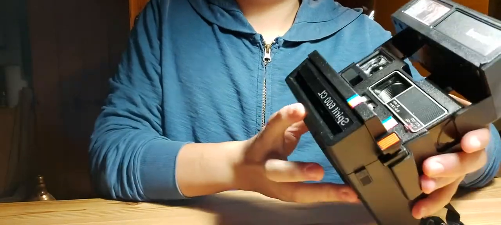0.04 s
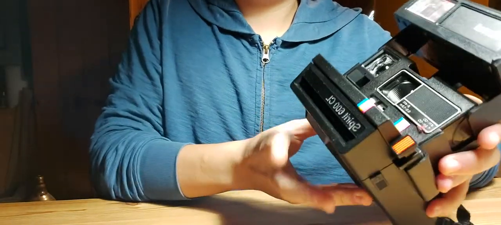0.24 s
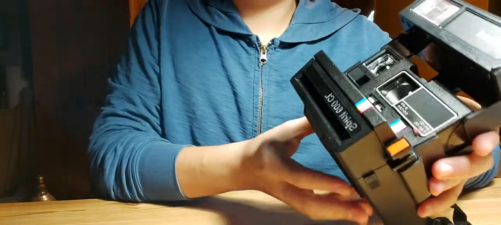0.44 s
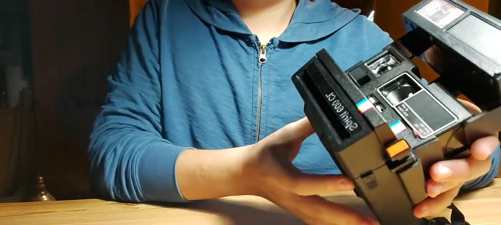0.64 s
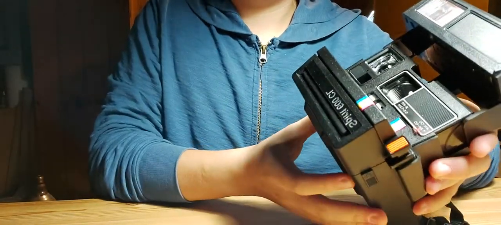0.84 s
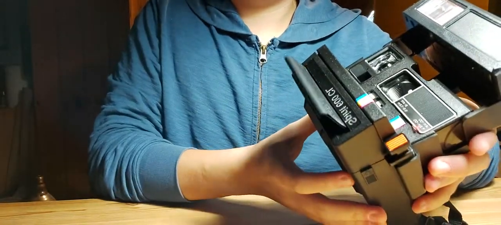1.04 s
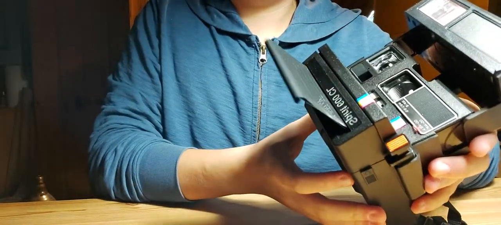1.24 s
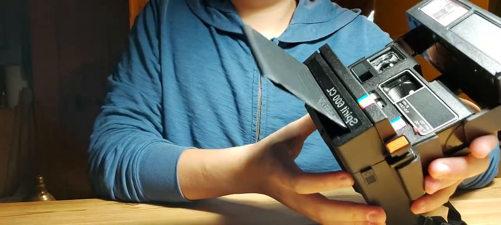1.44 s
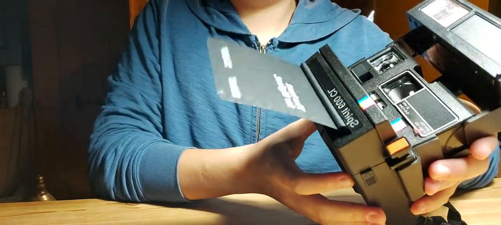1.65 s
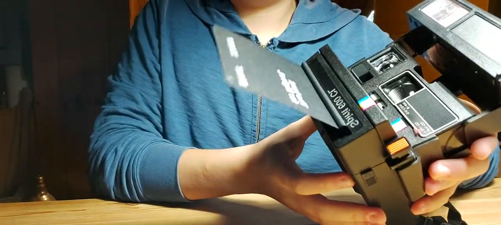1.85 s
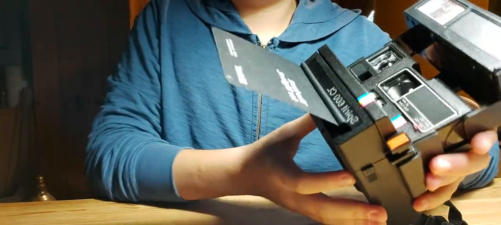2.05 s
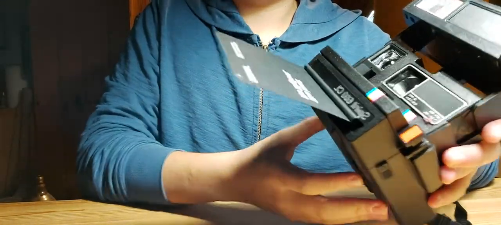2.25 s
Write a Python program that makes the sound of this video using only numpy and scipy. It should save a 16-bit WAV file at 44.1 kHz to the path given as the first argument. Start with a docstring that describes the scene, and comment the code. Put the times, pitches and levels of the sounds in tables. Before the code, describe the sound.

An instant camera's small motor starts at once, whining through rattling plastic gears, close by in a quiet room. At 0.8 seconds a click and a short falling squeak lead into roller grinding that grows louder. From about 1.3 to 1.7 seconds the sheet snaps free with sharp clacks and hollow knocks. The motor races briefly, a latch clicks near 1.9 seconds, and the gears stop by 2.1.

```python
"""An instant camera, held over a table in a quiet room, ejects a sheet.
Its small motor spins up and whines through a rattling plastic gear train, then slows as the rollers
bite with a squeak and grind along the sheet. The sheet snaps free in a cluster of clacks and hollow
knocks; the motor races briefly, a latch clicks and the gears coast to rest."""
import sys
import numpy as np
from scipy import signal
from scipy.fft import rfft, irfft
from scipy.io import wavfile

SR = 44100
rng = np.random.default_rng(int(sys.argv[2]) if len(sys.argv) > 2 else 0)


def generate_wav(sig):
    """Save sig (samples, or channels by samples) to the path in sys.argv[1] as 16-bit PCM at SR."""
    pcm = np.round(np.clip(np.atleast_2d(sig).T, -1, 1) * 32767).astype(np.int16)
    wavfile.write(sys.argv[1], SR, pcm)


N = 101429
T = np.arange(N) / SR

# The motor under power. Each row: time in seconds, turns per second.
MOTOR_SPEED = [(0,150),(.05,192),(.11,220),(.2,233),(.47,232.5),(.6,224.5),(.785,221.5),(.84,232),(.862,200),(.89,194.3),(.96,203.8),(1.0,205.5),(1.06,202.7),(1.15,208.5),(1.23,203.2),(1.31,207.5),(1.53,213),(1.6,218),(1.69,207),(1.75,221),(1.815,224),(1.85,198)]
POWER_OFF_S = MOTOR_SPEED[-1][0]
# The casing's resonances. Each row: pitch in Hz, relative level in dB, seconds to fade by 60 dB.
CASING_MODES = [(310,-14,.07),(630,-5,.06),(690,-3,.06),(930,-3,.09),(1100,-4,.08),(2433,-3,.055),(3741,-11,.06),(4215,-8,.06),(4974,-8,.05)]


def amp(db):
    """Decibels to gain."""
    return 10 ** (np.asarray(db) / 20)


def unit(x):
    """Scales to rms 1."""
    return x / np.sqrt(np.mean(x ** 2) + 1e-20)


def curve(points, column=1):
    """One column of a time table, at every sample."""
    points = np.array(points)
    return np.interp(T, points[:, 0], points[:, column])


def at_hz(points, hz):
    """Reads a spectrum table on a log-frequency axis."""
    f, value = np.transpose(points)
    return np.interp(np.log(hz + 1), np.log(f + 1), value)


def low_cut(x, hz, order):
    """Rolls off the bass."""
    return signal.sosfilt(signal.butter(order, hz, "high", fs=SR, output="sos"), x)


def drift(rate_hz):
    """Slow random wander of rms 1."""
    f = np.fft.rfftfreq(N, 1 / SR)
    return unit(irfft(rfft(rng.standard_normal(N)) / (1 + (f / rate_hz) ** 2) ** 2, N))


def partial(base_hz, multiple, wobble_hz, flutter):
    """A sine at a multiple of a wavering base pitch, fluttering in level."""
    turns = np.cumsum(base_hz + wobble_hz * drift(rate_hz=45)) / SR
    tone = np.sqrt(2) * np.sin(2 * np.pi * (multiple * turns + rng.random()))
    return tone * (1 + flutter * drift(rate_hz=36))


def colour(pair, tone, tilt_db=0):
    """Gives two unrelated signals an EQ curve and a stereo width, at rms 1."""
    # Each row: frequency in Hz, left-right correlation.
    likeness = [(200,0.68),(500,1),(1200,0.25),(2500,0.42),(5000,0.17),(15000,0)]
    n = pair.shape[1]
    f = np.fft.rfftfreq(n, 1 / SR)
    left, other = rfft(pair)
    shared = at_hz(likeness, f)
    right = shared * left + np.sqrt(1 - shared ** 2) * other
    octaves = np.log2(np.maximum(f, 400) / 2000)
    return unit(irfft(np.array([left, right]) * amp(at_hz(tone, f) + tilt_db * octaves), n))


def background():
    """A bed of soft room noise and faint steady tones."""
    # Each row: frequency in Hz, relative level in dB.
    air_tone = [(30, -13), (120, -2.5), (400, -4.5), (1200, -15), (4000, -22.5), (15000, -24)]
    # Room hum. Each row: base pitch in Hz (it sounds 2% lower), level in dB.
    hum = [(463,-77),(926,-74.5)]
    air = amp(-75) * colour(rng.standard_normal((2, N)), air_tone)
    return air + sum(amp(db) * partial(hz, 0.98, wobble_hz=0.71, flutter=0.093) for hz, db in hum)


def room(x):
    """A small room's diffuse tail, the treble dying first."""
    # Each row: frequency in Hz, seconds to fade by 60 dB.
    reverb_time = [(100,0.37),(700,0.39),(4000,0.25),(15000,0.16)]
    hz, t, noise = signal.stft(rng.standard_normal((2, SR // 2)), SR, nperseg=256)
    tail = signal.istft(noise * amp(-60 * t / at_hz(reverb_time, hz)[:, None]), SR, nperseg=256)[1]
    tail *= np.minimum(T[:tail.shape[1]] / 0.0046, 1)
    return signal.fftconvolve(x, tail / np.linalg.norm(tail[0]), axes=1)[:, :N]


def shell(x, ring_s, count=3, fades_per_s=1.5):
    """The plastic shell's dense, shallow ring, different on each side.
    Random rings crossfade so no pitch sticks out."""
    t = T[:2048]
    modes = rfft(rng.standard_normal((count, 2, len(t))) * np.exp(-t / ring_s))
    rings = irfft(modes / np.sqrt(abs(modes)))[..., :len(t) // 2]  # the root softens the peaks
    fades = [np.cos(np.pi * (fades_per_s * T + k / count)) for k in range(count)]
    return sum(signal.fftconvolve(x * fade, ring, axes=1)[:, :N] for fade, ring in zip(fades, rings))


def casing(x):
    """The casing's main modes ring along with whatever shakes it."""
    t = T[:SR // 4]
    ring = sum(amp(db - 60 * t / t60) * np.cos(2 * np.pi * hz * t) for hz, db, t60 in CASING_MODES)
    return x + amp(-26) * signal.fftconvolve(x, ring[None] / np.linalg.norm(ring), axes=1)[:, :N]


def motor(speed, push_s=0.55, ramp_s=.08):
    """A three-pole motor whines; its partials rebalance as the gears take up the sheet."""
    # The whine's fader. Each row: time in seconds, gain in dB.
    whine_level = [(0,-52),(.06,-43.5),(.12,-38),(.2,-43),(.27,-40),(.52,-37.5),(.59,-32),(.78,-35.5),(.81,-44),(.84,-33),(.87,-51),(1.3,-43.5),(1.66,-40.5),(1.71,-39.5),(1.8,-34.5),(1.85,-48.5),(1.95,-62),(2.1,-81)]
    # Each row: multiple of the shaft speed, relative dB running free, relative dB pushing the sheet.
    partials = [(1,-10,-24),(2,-15,-15),(2.5,-25,-22),(3,0,0),(4,-10,-16),(5,-17,-26),(6,-12,-22),(7,-17,-9.3),(11,-24,-21),(21,-21,-28)]
    push = np.clip((T - push_s) / ramp_s + .5, 0, 1)
    whine = sum(amp(free + (loaded - free) * push) * partial(speed, k, wobble_hz=.15, flutter=.08)
                for k, free, loaded in partials)
    return amp(curve(whine_level)) * low_cut(whine, hz=222, order=4)  # a small shell radiates little bass


def teeth(speed, per_turn, spread_db, rub, throb):
    """Tooth contacts of uneven strength and some rubbing, throbbing once a turn."""
    turns = np.cumsum(speed) / SR
    contacts = np.diff(np.floor(turns * per_turn), prepend=0)
    ticks = contacts * rng.standard_normal((2, N)) * amp(spread_db * rng.standard_normal(N))
    return (unit(ticks) + rub * rng.standard_normal((2, N))) * (1 + throb * np.sin(2 * np.pi * turns))


def gears(speed):
    """The gear train rattles in the shell, duller as it coasts."""
    # The rattle's fader. Each row: time in seconds, level in dB.
    rattle_level = [(0,-34),(.11,-35),(.19,-36),(.23,-34),(.28,-35),(.45,-33.5),(.6,-32),(.78,-32.5),(1.2,-31.5),(1.6,-29),(1.72,-34),(1.85,-31),(1.93,-38.5),(2.0,-42.5),(2.07,-50.5),(2.13,-63.5),(2.3,-96.5)]
    # Its EQ under power and coasting. Each row: frequency in Hz, relative level in dB.
    driven_tone = [(35,-41),(100,-17.5),(170,-16.5),(350,1.5),(700,-2.5),(1150,-0.5),(1450,5),(1850,2),(2350,3),(3400,-3),(4200,2.5),(5600,-2.5),(7200,-3),(10400,-7),(11300,-0.5),(14000,-5.5),(15400,0)]
    coast_tone = [(130,-17),(280,2.5),(450,2.5),(690,5.5),(1050,-1),(1550,4.5),(2500,-1),(3500,-5),(4500,-2.5),(6000,-6.5),(11500,-10.5),(15500,-14)]
    rattle = shell(teeth(speed, per_turn=7, spread_db=2, rub=0.8, throb=0.47), ring_s=.006)
    coast = np.clip((T - POWER_OFF_S) / 0.068, 0, 1)
    blend = (1 - coast) * colour(rattle, driven_tone) + coast * colour(rattle, coast_tone)
    return blend * amp(curve(rattle_level))


def rollers(speed, full_song_db=-33.5):
    """The rollers grind on the sheet and the loaded gears sing."""
    # The grind's fader. Each row: time in seconds, level in dB.
    grind_level = [(.77,-49),(.8,-36),(.9,-34),(1.15,-32.5),(1.25,-31),(1.4,-29),(1.52,-27),(1.54,-40),(1.57,-27.5),(1.66,-36.5),(1.69,-39),(1.73,-68)]
    # Its EQ. Each row: frequency in Hz, relative level in dB.
    grind_tone = [(40,-44),(100,-28.5),(190,-11),(330,-3),(650,2.5),(1100,-7.5),(1430,0.5),(1800,-7.5),(2280,5),(2900,0),(4100,5),(4900,4),(5500,-5.5),(6500,2),(7400,-12.5),(8800,-8.5),(10700,0),(12200,-4.5),(15600,-16.5)]
    # The singing gears. Each row: multiple of the shaft speed, level in dB at full song.
    mesh_partials = [(1.6,-53),(2.35,-52),(4.5,-55),(6.85,-48.5),(9.4,-55),(10.8,-47),(15.65,-44),(19.6,-53),(47,-52.5)]
    load_db = curve(grind_level)
    contacts = teeth(speed, per_turn=10.8, spread_db=1.0, rub=0.42, throb=0.19)
    grind = amp(load_db) * colour(shell(contacts, ring_s=0.0066), grind_tone)
    song = sum(amp(db) * partial(speed, k, wobble_hz=.28, flutter=.4) for k, db in mesh_partials)
    song *= amp(np.minimum(load_db - full_song_db, 0))  # swells with the grind, up to a ceiling
    return (grind + song) * (T > grind_level[0][0]) * (T < grind_level[-1][0])


def squeak():
    """A rough, falling squeak as the rollers bite the sheet."""
    # Each row: time in seconds, pitch in Hz, level in dB.
    glide = [(.783,4200,-52),(.797,4030,-40.5),(.825,3600,-44.5),(.855,3290,-44),(.89,3050,-60)]
    tone = partial(curve(glide), 1, wobble_hz=200, flutter=0.17)
    return tone * amp(curve(glide, column=2)) * (T > glide[0][0]) * (T < glide[-1][0])


def knocks(rise_s=.003):
    """Hollow knocks: each jolt rings one low mode of the camera body."""
    # Each row: start in seconds, pitch in Hz, level in dB, seconds to fade by 60 dB.
    jolts = [(.794,385,-28,.05),(1.612,64,-50,.42),(1.613,280,-26,.06),(1.6175,720,-21,.025),(1.666,720,-12,.035),(1.884,297,-33,.12)]
    mix = np.zeros(N)
    for start, hz, db, t60 in jolts:
        t = np.maximum(T - start, 0)
        mix += amp(db - 60 * t / t60) * np.minimum(t / rise_s, 1) * np.sin(2 * np.pi * hz * t)
    return mix


def clacks(ring_trim_db=-11.5):
    """Each clack is a sharp crack of plastic with the casing ringing after it."""
    # Each row: start in seconds, level in dB, brightness in dB per octave, decay in seconds,
    # ring send in dB before the trim.
    cues = [(0.221,-32.5,-7,0.015,-20),(.789,-34,-11,0.011,-10),(.7945,-21.5,4,.0026,-10),(1.3458,-13.5,2.5,0.0023,-21),(1.44,-19,0,0.0032,-7),(1.5362,-8.5,14,0.0018,-40.5),(1.5651,-14,1.5,0.0022,-11),(1.5835,-18,3,0.0022,-12.5),
            (1.5978,-12.5,8,0.0026,-24.5),(1.6004,-12,5,0.0039,-6),(1.6035,-9,7.5,0.0039,-11),(1.6105,-13.5,0,0.0013,-13),(1.6128,-6,3.5,0.0022,-12),(1.6177,-12.5,-6.5,0.0024,1.5),
            (1.6522,-17,-1,0.0041,-7.5),(1.6669,-10.5,-1.5,.0026,-10.5),(1.674,-16.5,0,0.0049,-4.5),(1.8672,-19.5,0.5,0.0025,-3.5),(1.870,-23,-2,0.0074,6),(2.269,-63,1.5,0.0033,-6.5)]
    # The crack's EQ. Each row: frequency in Hz, relative level in dB.
    crack_tone = [(50,-23.5),(150,-17.5),(300,-10),(700,0),(1300,1),(2300,9.5),(3400,-2),(4300,4),(5500,3),(8000,-5.5),(12000,-4.5),(16000,-10)]
    t, mix = T[:SR // 4], np.zeros((2, N))
    for start, db, tilt_db, decay, ring_db in cues:
        crack = colour(rng.standard_normal((2, len(t))), crack_tone, tilt_db) * np.exp(-t / decay)
        ring = sum(amp(level - 60 * t / t60) * np.cos(2 * np.pi * (hz * t + rng.random()))
                   for hz, level, t60 in CASING_MODES)
        clack = amp(db) * (crack + amp(ring_db + ring_trim_db) * ring)
        onset = round(start * SR)
        mix[:, onset:onset + len(t)] += clack[:, :N - onset]
    return low_cut(mix, hz=120, order=2)


def scene(coast_s=.4):
    """One shaft drives whine, rattle and grind; clacks and knocks land on top, with more reverb."""
    speed = curve(MOTOR_SPEED) * np.exp(-np.maximum(T - POWER_OFF_S, 0) / coast_s)
    hits = clacks() + knocks()
    train = casing(gears(speed) + rollers(speed) + squeak())
    return motor(speed) + train + hits + amp(-14.5) * room(train) + amp(-8.5) * room(hits) + background()


def record(dry, lag_s=.00004, top_hz=15780):
    """The right microphone is nearer, so the lows reach the left one late; the top end is cut."""
    # Each row: frequency in Hz, left minus right in dB.
    balance = [(100,-2.5),(400,-2.8),(1200,-4),(2500,-3),(5000,-1),(8500,-1.5),(15000,-4.5)]
    f = np.fft.rfftfreq(N, 1 / SR)
    side_db = at_hz(balance, f) / 2
    lag = np.exp(-2j * np.pi * f * lag_s / (1 + (f / 2000) ** 2))
    panned = irfft(rfft(dry) * np.array([amp(side_db) * lag, amp(-side_db)]), N)
    high_cut = signal.firwin(511, top_hz, window=("kaiser", 9), fs=SR)
    return signal.oaconvolve(panned, high_cut[None], "same")


dry = scene()
out = record(dry)
generate_wav(out)
```